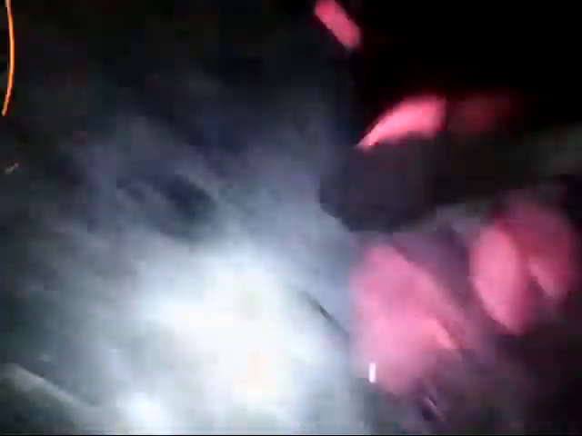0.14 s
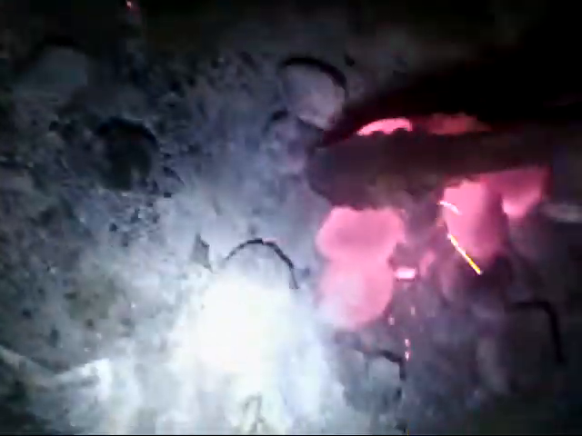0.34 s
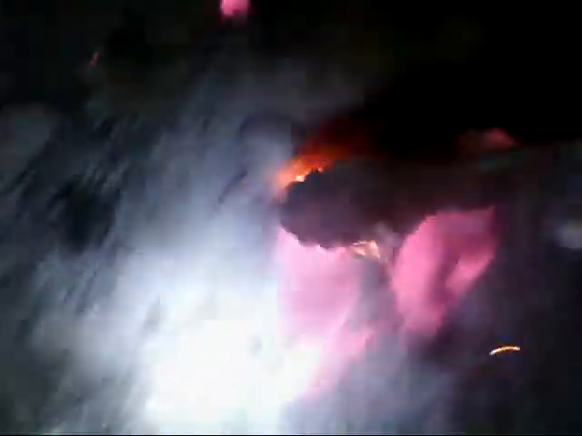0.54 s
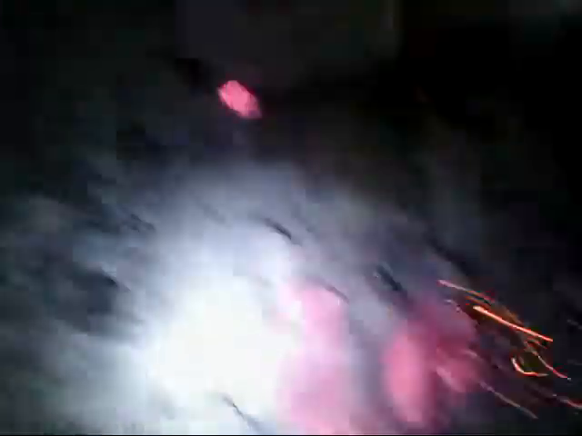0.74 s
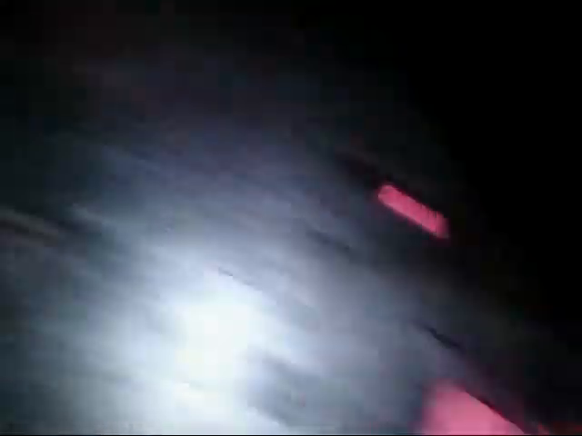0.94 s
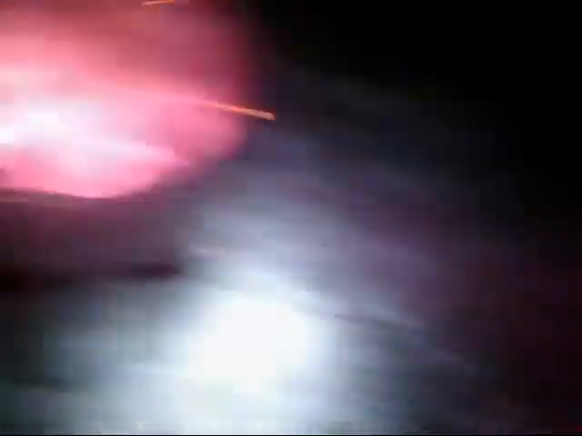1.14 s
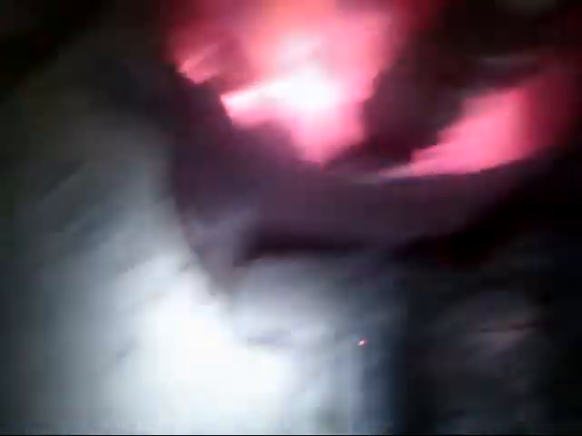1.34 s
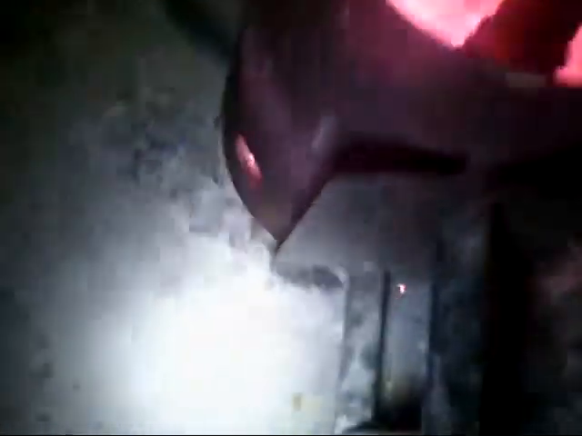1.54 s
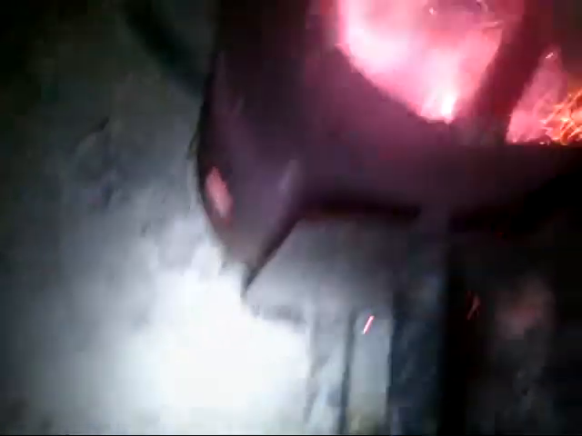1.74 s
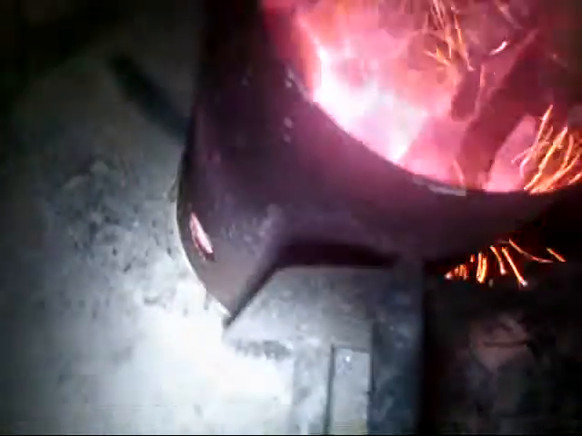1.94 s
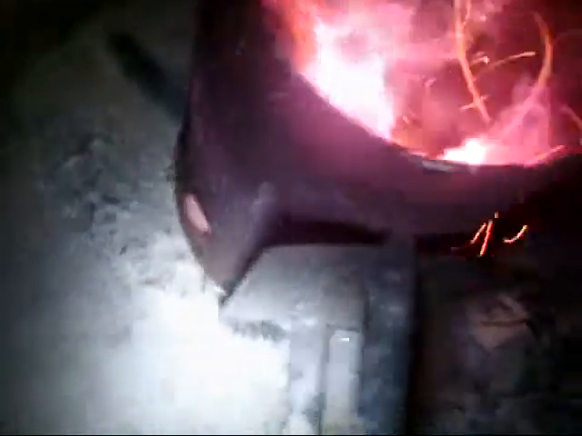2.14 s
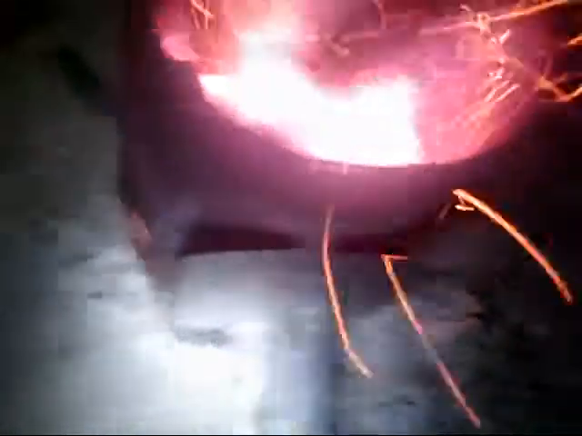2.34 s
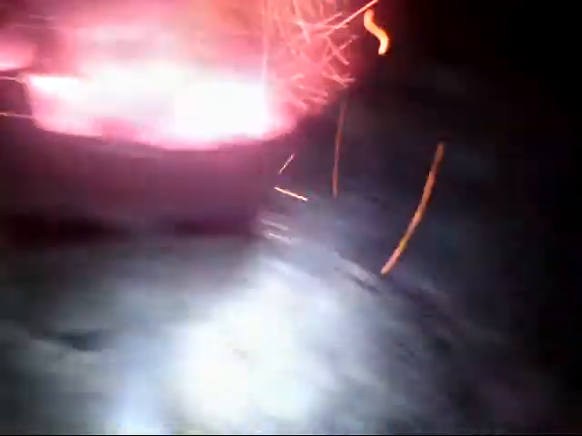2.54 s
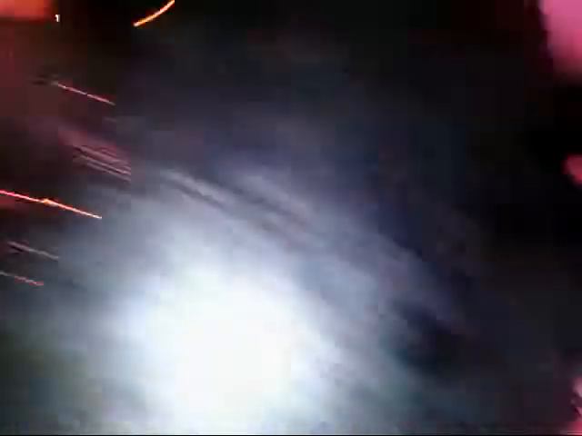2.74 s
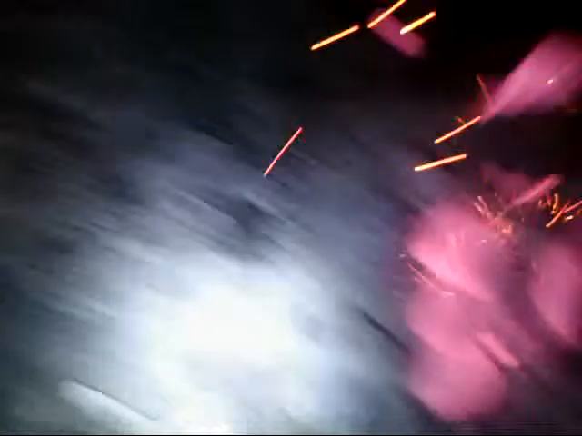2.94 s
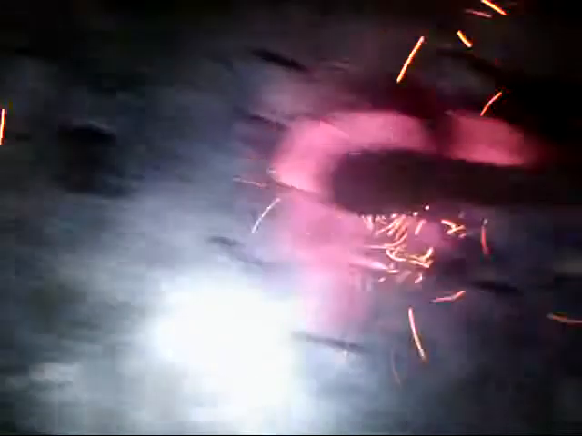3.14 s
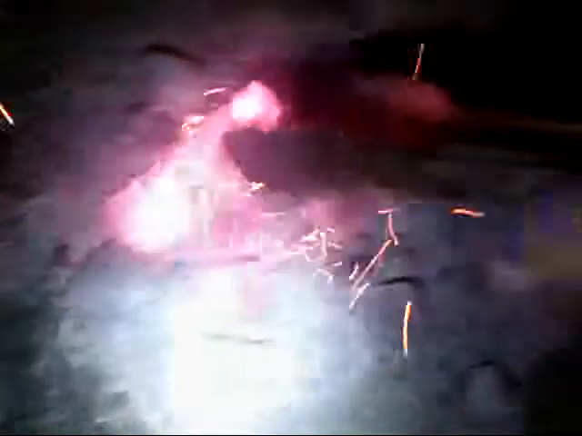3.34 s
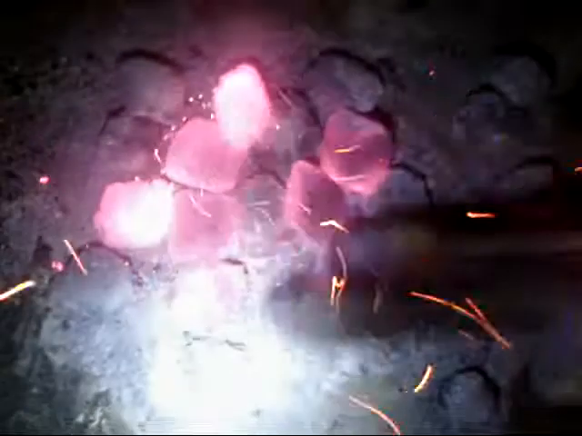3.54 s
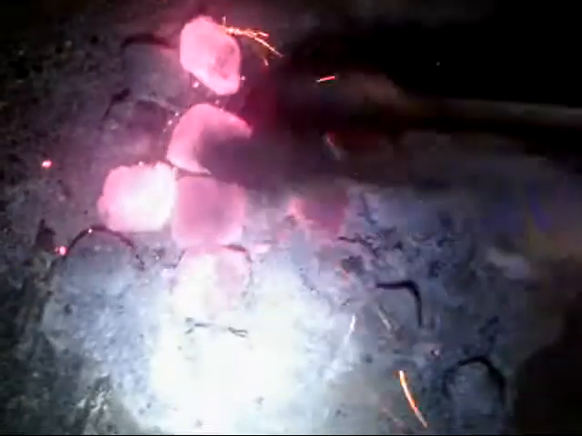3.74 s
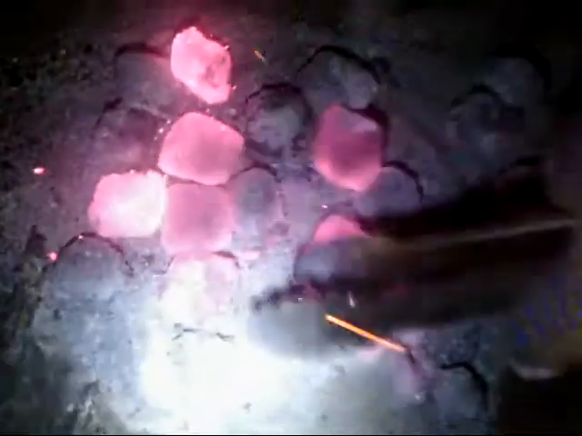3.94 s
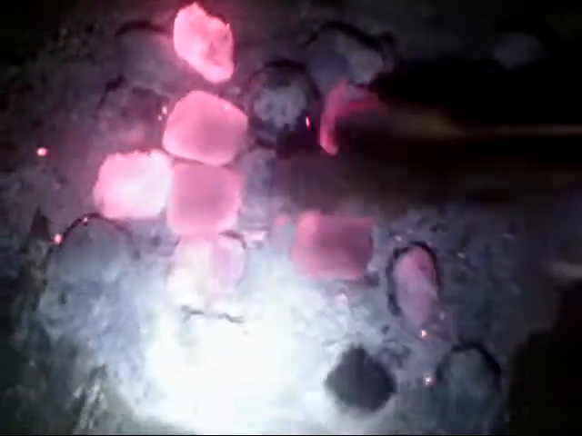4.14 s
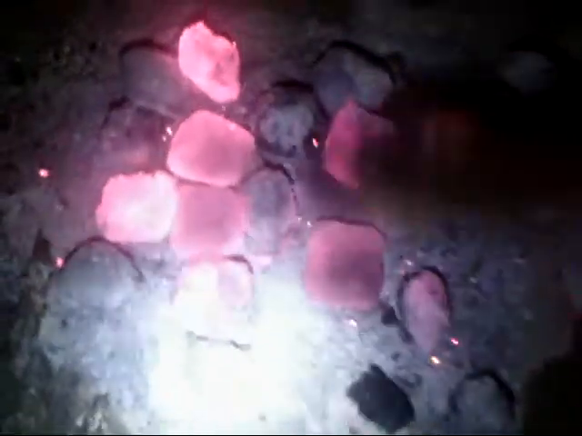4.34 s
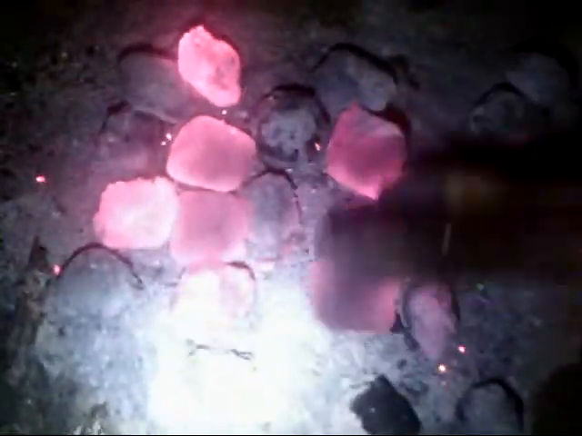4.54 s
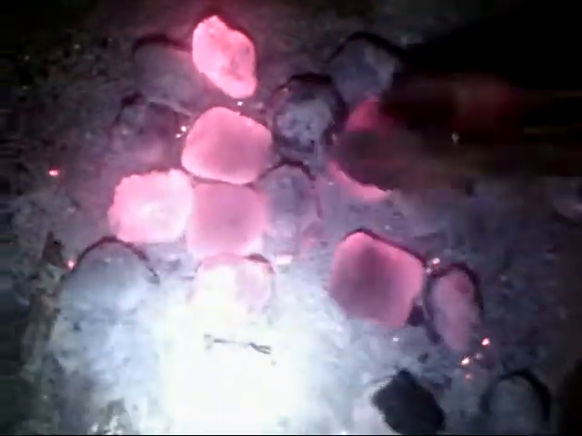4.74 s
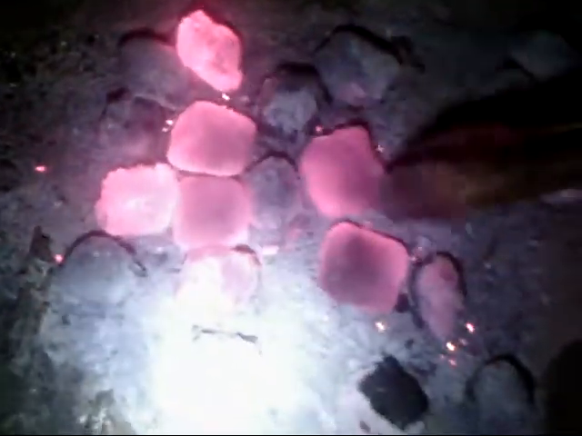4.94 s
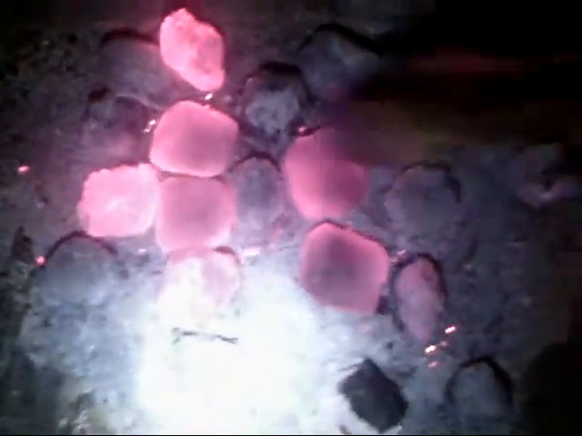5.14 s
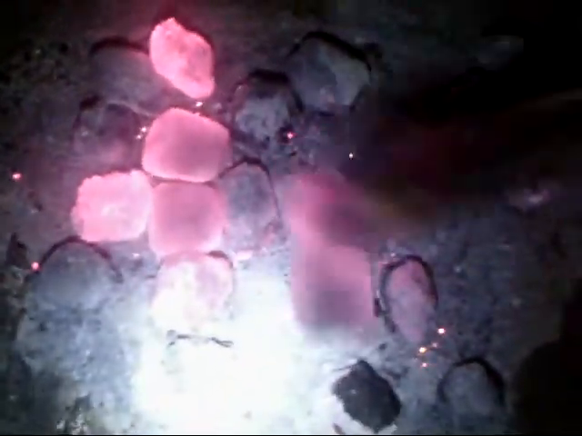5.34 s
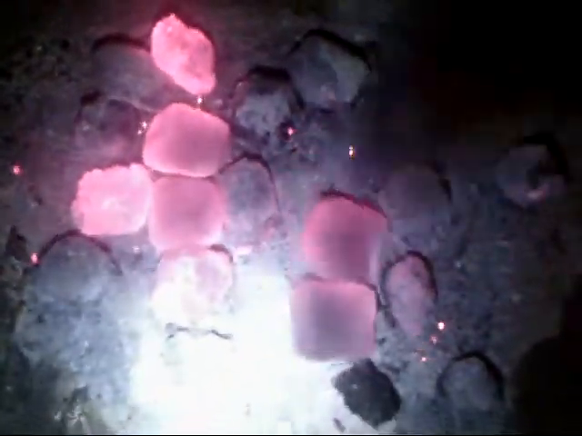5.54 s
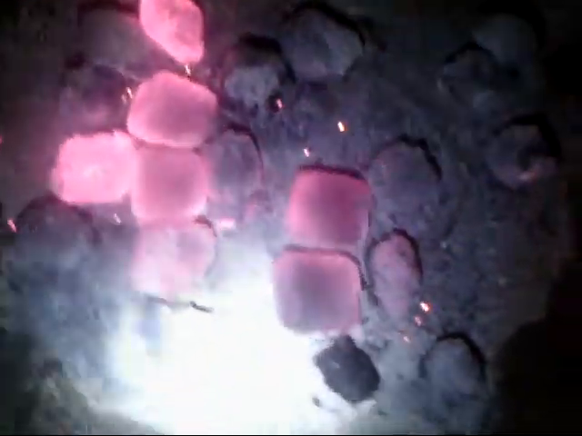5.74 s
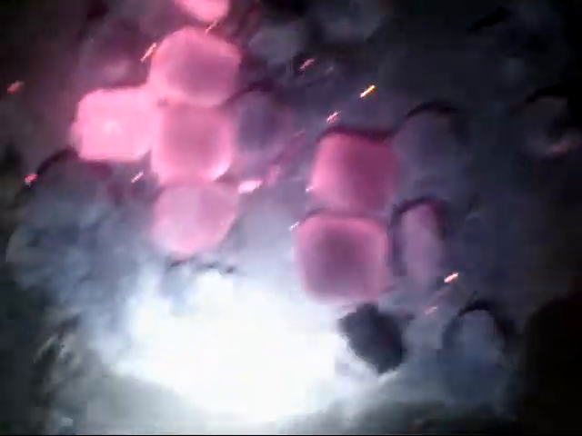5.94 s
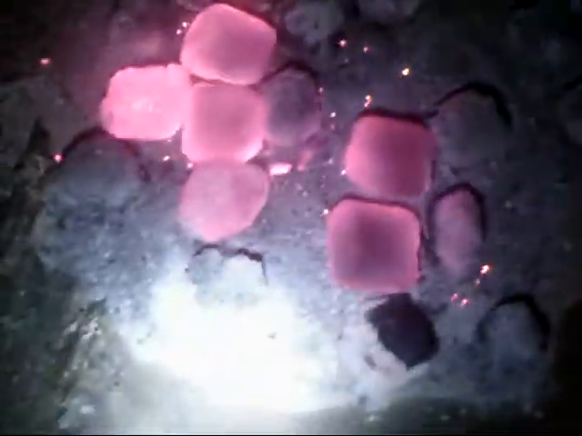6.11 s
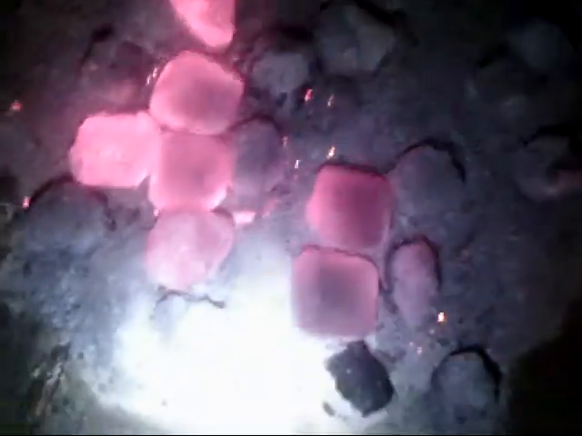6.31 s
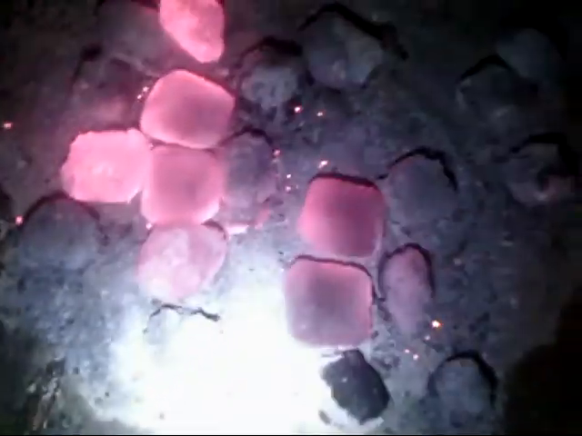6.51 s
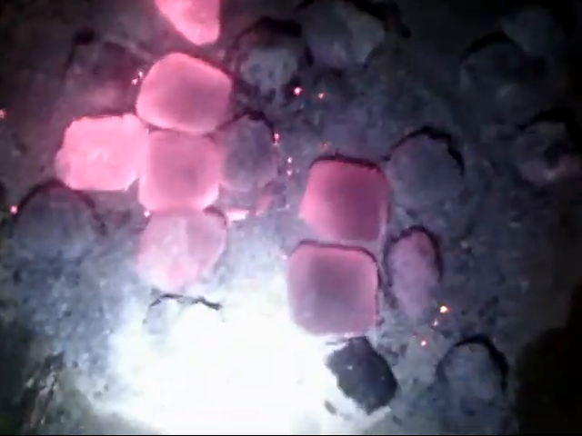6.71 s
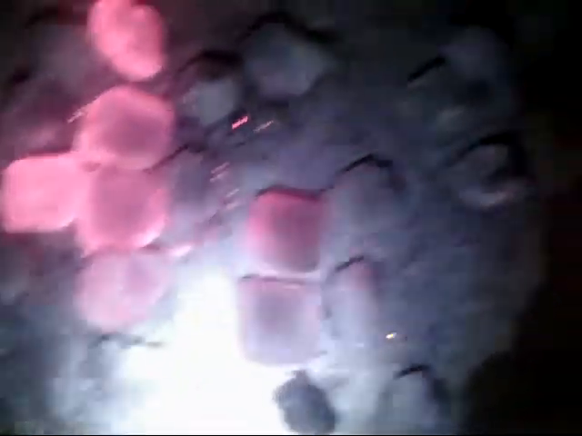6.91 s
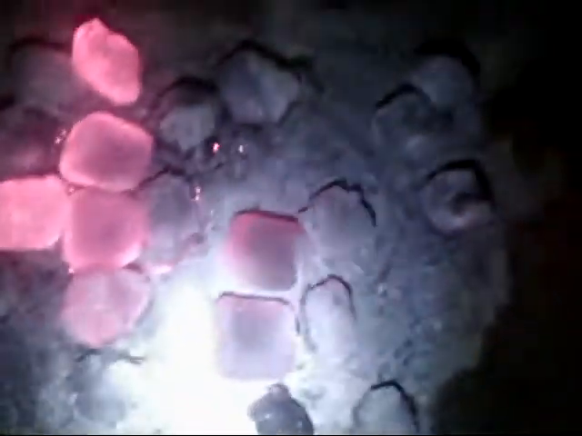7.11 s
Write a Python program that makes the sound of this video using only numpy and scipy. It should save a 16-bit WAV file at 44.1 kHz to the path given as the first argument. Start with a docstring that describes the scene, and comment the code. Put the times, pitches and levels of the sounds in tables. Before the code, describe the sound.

A low handling rumble opens close to the microphone over hiss, light wind and a thin fluttering whine. Tongs bump charcoal briquettes on an ashy iron lid in dull knocks, short scrapes and faint steel clinks. The loudest thud comes near three seconds, followed by a quick cluster and a sharp crack. Later touches are sparser, with a long quiet gap before a last pair of knocks.

```python
"""A low rumble as the camera is moved comes first, over air hiss, light wind and a fluttering whine.
Outdoors at night, tongs then set glowing charcoal briquettes on the ashy lid of a cast iron pot.
They knock dully, crumble and scrape; the tongs clink, and now and then a hot briquette cracks.
Bursts of force excite decaying modes of lid, charcoal and steel, and the yard adds a short scatter.
Shaped noise makes the rumble, wind and hiss; sine tones make the far hum and the camera's electronics."""
import sys
import numpy as np
from scipy import signal
from scipy.fft import rfft, irfft, next_fast_len
from scipy.io import wavfile

SR = 44100
rng = np.random.default_rng(int(sys.argv[2]) if len(sys.argv) > 2 else 0)


def put_to_file(sound):
    """Save the sound as 16-bit audio at rate SR, in the file named by the first command-line argument."""
    columns = np.atleast_2d(sound).T  # one column per channel
    safe = np.clip(columns, -1, 1)
    whole_steps = np.round(safe * 32767)
    wavfile.write(sys.argv[1], SR, whole_steps.astype(np.int16))


N = 320594
TIME = np.arange(N) / SR
AGE = TIME[:SR // 3]  # seconds since a contact

# Briquettes set down or bumped on the lid, levels of the first touch:
# start_s, knock_db, thud_db, crunch_db, knock_pitch_hz, thud_pitch_hz
KNOCK_EVENTS = [(0.528, -42, -37, -44, 630, 130), (0.649, -36.5, -31.5, -50, 610, 144),
                (1.487, -34.5, -39, -52, 570, 130), (1.589, -46, -44, -49, 1080, 163),
                (1.694, -32.5, -31.5, -61, 720, 290), (1.857, -42, -34.5, -65, 640, 139),
                (1.971, -49, -33.5, -53, 789, 190), (3.011, -23, -19, -44, 846, 122),
                (3.139, -48, -36.5, -55, 627, 129), (3.281, -47, -32.5, -47.5, 603, 124),
                (3.363, -32, -27, -55, 835, 140), (3.438, -48, -32.5, -57, 581, 195),
                (3.528, -46, -44, -49, 595, 269), (3.548, -46.5, -32, -46, 678, 167),
                (3.723, -63, -37, -60, 800, 140), (3.95, -38.5, -32.5, -40, 610, 127),
                (4.436, -37.5, -46, -53, 584, 163), (4.523, -40, -36, -43.5, 645, 142),
                (4.889, -39, -34, -47, 705, 126), (5.387, -48, -29, -50, 676, 127),
                (5.471, -42, -34, -42, 715, 129), (6.871, -36.5, -35, -40.5, 620, 288),
                (7.038, -48, -39, -52.5, 700, 140)]
# Briquettes pushed through ash: start_s, length_s, rub_db, crunch_db, thud_db, thud_pitch_hz
SCRAPE_EVENTS = [(0.519, 0.02, -45.5, -51, -42.5, 191), (1.485, 0.048, -47.5, -46, -46.5, 270),
                 (1.586, 0.037, -50, -49.5, -49, 250), (1.633, 0.022, -41, -45, -41, 270),
                 (1.686, 0.051, -39, -47, -38.5, 270), (1.773, 0.097, -46, -49.5, -42.5, 230),
                 (2.038, 0.065, -50, -47, -40, 192), (3.008, 0.031, -31, -46, -29, 206),
                 (3.182, 0.026, -48.5, -49.5, -38.5, 198), (3.94, 0.031, -40, -44.5, -41, 164),
                 (4.002, .055, -53, -55, -50.5, 151), (4.413, 0.019, -45.5, -56, -35, 148),
                 (4.834, 0.051, -43, -54, -39, 130), (4.888, 0.043, -41.5, -46.5, -37.5, 127),
                 (5.38, 0.073, -42, -46.5, -36.5, 120), (5.45, 0.035, -38, -49, -35.5, 131),
                 (6.027, 0.12, -53.5, -53.5, -49.5, 161), (6.876, 0.026, -39.5, -42.5, -34.5, 283)]
# Tongs meeting charcoal: start_s, level_db, pitch_hz
CLINK_EVENTS = [(0.501, -48, 1590), (0.538, -49, 2450), (1.489, -43, 1500), (1.722, -42, 2000),
                (3.02, -46, 2470), (3.973, -43, 2500), (4.888, -43, 2400), (5.412, -44, 2480),
                (5.444, -49, 3970), (5.475, -41, 2220), (6.058, -49, 3300), (6.110, -47, 1620),
                (6.138, -45.5, 3600), (6.872, -40, 2560), (6.895, -52, 1900)]
# Hot charcoal cracking: start_s, level_db, low_edge_hz, high_edge_hz
CRACK_EVENTS = [(2.08, -33, 594, 7700), (2.648, -43.5, 1480, 3830), (3.011, -45, 3030, 15500),
                (3.037, -51, 3000, 15000), (3.316, -47, 1200, 15000), (3.606, -31.5, 490, 15000),
                (6.175, -51, 1300, 13000)]

# Resonances, relative levels: pitch_hz, width_hz, level_db
# Briquette on iron, damped by ash
KNOCK_MODES = [(382, 22, -18), (547, 37, 1), (597, 72, 9), (703, 83, 7), (745, 29, 0), (924, 67, 3),
               (1132, 68, -6), (1240, 27, -27)]
# The loaded lid's low thud
LID_MODES = [(118, 41, 6.5), (200.4, 32, 0.5), (266, 270, -10)]
# Brittle charcoal against tongs and iron
CRUNCH_MODES = [(1340, 590, 11), (1980, 370, 2.5), (2400, 78, 12), (3250, 710, -44), (4100, 260, -1.5),
                (6000, 700, -13), (8270, 360, 2.5), (13500, 700, -1)]
# The steel tongs, damped by the hand
TONGS_MODES = [(1540, 160, 4), (2200, 76, -4.5), (2486, 48, 7.5), (4230, 120, 1.5), (5060, 170, -7),
               (8600, 310, -3)]
# A briquette cracking
CRACK_MODES = [(650, 280, 15.5), (1320, 310, -14), (1700, 290, 1), (2430, 210, 5), (3970, 320, -1.5),
               (5370, 150, -11), (6850, 130, 4), (8100, 1100, 2), (10900, 700, -41), (12100, 530, -13),
               (13600, 1100, -19)]

# Wind on the microphone, relative spectrum: pitch_hz, density_db_per_hz
WIND_SPECTRUM = [(4, 0), (10, 4.5), (18, -9.5), (33, -7), (50, -12), (68, -13), (98, -15.5), (150, -37.5),
                 (200, -59), (400, -75)]
# Low rumbles as the camera is moved, over the breeze: middle_s, half_length_s, rise_db
HANDLING_RUMBLES = [(0.03, 0.1, 11.5), (1.09, 0.21, 8.5)]
# Night air and microphone hiss, relative spectrum: pitch_hz, density_db_per_hz
AIR_SPECTRUM = [(100, -5.5), (190, -4.5), (280, -7.5), (450, -12), (700, -11.5), (1170, -13), (1500, -16),
                (2200, -18), (2520, -18.5), (2900, -21.5), (7500, -25), (9600, -26), (10600, -31.5),
                (15800, -34)]
# Distant hum, levels before wavering: pitch_hz, level_db
HUM_TONES = [(133, -53.5), (167, -56), (533, -67.5), (1168, -67.5)]
# Steady thin tones of the camera's electronics: pitch_hz, level_db
CAMERA_TONES = [(4801, -81), (5600, -75.5), (7401, -78)]

TOUCH_DB = 1.5  # spread of mode strengths between contacts
BLOW_S = 0.01  # a blow's level is its energy spread over this time
# Two rocking touches follow each landing, with their own thud pitch
ROCK_S, ROCK_UNEVEN, ROCK_THUD_HZ = 0.018, 0.12, 221
KNOCK_LOSS_DB, THUD_LOSS_DB, CRUNCH_LOSS_DB = 21.5, 6.5, 5  # per touch
CRUMBLE_S = 0.068  # time for the giving grains to fall 60 dB
GRAB_S, SWELL_DB = 0.013, 2  # a push takes hold, then bears down harder
RUB_T60_S, CRUNCH_T60_S, THUD_T60_S = 0.14, 0.16, 0.21  # 60 dB release times
# Level before the handling rumbles, spread, rate
BREEZE_DB, BREEZE_SWAY_DB, BREEZE_SWAYS_PER_S = -37, 1.65, 4.3
AIR_DB = -49.5
WHINE_HZ, FLUTTER_HZ, WHINE_DB = 2579.6, 19.89, -58.5  # level while fully on
CUTOFF_HZ, OFFSET = 15900, -0.016  # offset in parts of full scale


def knocks():
    """Each briquette lands and rocks twice; every touch shakes the lid and crushes charcoal."""
    out = np.zeros(N)
    for s, knock_db, thud_db, crunch_db, knock_hz, thud_hz in KNOCK_EVENTS:
        for touch in range(3):
            at = s + touch * ROCK_S * (1 + ROCK_UNEVEN * rng.uniform(-1, 1))
            press = contact(CRUMBLE_S, crumble_db=-1.5)
            crush = contact(CRUMBLE_S, crumble_db=28)
            iron = knock(knock_hz, focus_db=51)
            lid = thud(ROCK_THUD_HZ if touch else thud_hz)
            add(out, at, blow(press, iron, knock_db - touch * KNOCK_LOSS_DB))
            add(out, at, blow(press, lid, thud_db - touch * THUD_LOSS_DB))
            add(out, at, blow(crush, crunch(), crunch_db - touch * CRUNCH_LOSS_DB))
    return out


def scrapes():
    """A sliding briquette catches and slips, exciting lid and charcoal with small fractures."""
    grip = from_db(2.96 * drift(130))
    slips = rms_one(grains(N, per_s=1200, spread_db=2.5) * grip)
    fractures = rms_one(grains(N, per_s=800, spread_db=-1.5) * grip)
    out = np.zeros(N)
    for s, length_s, rub_db, crunch_db, thud_db, thud_hz in SCRAPE_EVENTS:
        sounds = [(slips, knock(pitch_hz=704, focus_db=1.5), rub_db, RUB_T60_S),
                  (fractures, crunch(), crunch_db, CRUNCH_T60_S),
                  (slips, thud(thud_hz), thud_db, THUD_T60_S)]
        for force, body, db, release_t60 in sounds:
            from_start = np.roll(force, -round(s * SR))[:SR]
            stroke = from_start * push(length_s, release_t60)
            add(out, s, from_db(db) * signal.fftconvolve(stroke, body))
    return out


def clinks():
    """The steel tongs ring briefly where they meet a hard edge."""
    out = np.zeros(N)
    for s, db, pitch_hz in CLINK_EVENTS:
        modes = favour(TONGS_MODES, pitch_hz, focus_db=19)
        steel = within(ring(modes, detune=0.014), low_hz=1190, high_hz=11000)
        add(out, s, blow(contact(crumble_s=0.026, crumble_db=4.5), steel, db))
    return out


def cracks():
    """A hot briquette splits in a dense burst of fractures that falls 60 dB in 29 ms."""
    out = np.zeros(N)
    for s, db, low_hz, high_hz in CRACK_EVENTS:
        shard = within(ring(CRACK_MODES, detune=0.0085), low_hz, high_hz)
        add(out, s, blow(contact(crumble_s=0.029, crumble_db=29), shard, db))
    return out


def knock(pitch_hz, focus_db):
    """The dull note of charcoal on iron."""
    modes = favour(KNOCK_MODES, pitch_hz, focus_db)
    return within(ring(modes, detune=0.045), low_hz=396, high_hz=1234)


def thud(pitch_hz):
    """The lid gives under the weight."""
    modes = favour(LID_MODES, pitch_hz, focus_db=20)
    return within(ring(modes, detune=0.044), low_hz=78, high_hz=370)


def crunch():
    """The bright sound of a breaking grain."""
    return within(ring(CRUNCH_MODES, detune=0.012), low_hz=970, high_hz=13100)


def contact(crumble_s, crumble_db):
    """One push, then grains giving way ever more weakly."""
    fading = grains(len(AGE), per_s=3800, spread_db=-0.5) * from_db(-60 * AGE / crumble_s)
    force = from_db(crumble_db) * unit_energy(fading)
    force[0] += 1
    return unit_energy(force)


def grains(size, per_s, spread_db):
    """Tiny fractures of either sign at random moments, with sizes scattered in decibels."""
    chance, sign = rng.random((2, size))
    sizes = from_db(spread_db * np.minimum(rng.exponential(1, size), 4))
    return rms_one((chance < per_s / SR) * np.sign(sign - 0.5) * sizes)


def push(length_s, release_t60):
    """The pressure of one stroke: attack, swelling hold, release."""
    t = TIME[:SR]
    swell_db = SWELL_DB * (np.minimum(t / length_s, 1) - 0.5)
    release_db = -60 * np.maximum(t - length_s, 0) / release_t60
    return np.minimum(t / GRAB_S, 1) * from_db(swell_db + release_db)


def blow(force, body, db):
    """A body struck at a given level."""
    return from_db(db) * np.sqrt(BLOW_S * SR) * signal.fftconvolve(force, body)


def favour(modes, pitch_hz, focus_db):
    """The point of contact favours one pitch; modes fade by focus_db per octave away from it."""
    return [(hz, width, db - focus_db * abs(np.log2(hz / pitch_hz))) for hz, width, db in modes]


def ring(modes, detune):
    """A body's answer to one click; each contact weights and shifts the modes a little."""
    out = 0
    for hz, width, db in modes:
        strength, shift = rng.standard_normal(2)
        swing = np.cos(2 * np.pi * hz * (1 + detune * shift) * AGE)
        decay = np.exp(-np.pi * width * AGE)
        out = out + from_db(db + TOUCH_DB * strength) * width * swing * decay
    return unit_energy(out)


def within(x, low_hz, high_hz):
    """Keep the range that a body radiates."""
    band = signal.butter(3, [low_hz, high_hz], "band", fs=SR, output="sos")
    return unit_energy(signal.sosfilt(band, x))


def yard(x, tail_db, tail_t60, tail_hz):
    """A short scatter from the ground and things around, with weakened treble."""
    scatter = rng.standard_normal(len(AGE)) * from_db(-60 * AGE / tail_t60)
    scatter = scatter * (1 - np.exp(-AGE / 0.003))  # soft onset
    late = signal.fftconvolve(x, unit_energy(scatter))[:N]
    return x + from_db(tail_db) * (lowpass(late, tail_hz) + from_db(-5.5) * late)


def wind_and_handling():
    """A light, restless breeze on the microphone; the same low noise rises as the camera is moved."""
    rumble_db = sum(db * np.exp(-((TIME - s) / half_s) ** 2) for s, half_s, db in HANDLING_RUMBLES)
    sway_db = BREEZE_SWAY_DB * drift(BREEZE_SWAYS_PER_S)
    return from_db(BREEZE_DB + sway_db + rumble_db) * noise(WIND_SPECTRUM)


def air():
    """Even hiss of night air and microphone: steady shaped noise."""
    return from_db(AIR_DB) * noise(AIR_SPECTRUM)


def far_hum():
    """Distant sine tones that waver in level and phase."""
    out = np.zeros(N)
    for hz, db in HUM_TONES:
        level = from_db(db + 1.75 * drift(14))
        out += level * np.sin(2 * np.pi * hz * TIME + 1.48 * drift(11))
    return np.sqrt(2) * out


def electronics():
    """The camera's thin steady tones, and a whine that fades on and off at the flutter rate."""
    on = np.clip(1.5 - 2.5 * np.cos(2 * np.pi * FLUTTER_HZ * TIME + 0.2), 0, 1)
    whine = from_db(WHINE_DB) * on * np.sin(2 * np.pi * WHINE_HZ * TIME)
    steady = sum(from_db(db) * np.sin(2 * np.pi * hz * TIME) for hz, db in CAMERA_TONES)
    return np.sqrt(2) * (whine + steady)


def noise(spectrum):
    """Random noise of a given colour, unit power."""
    hz, db = np.transpose(spectrum)
    size = next_fast_len(N)
    bins_hz = np.maximum(np.arange(size // 2 + 1) * SR / size, 1)
    colour = from_db(np.interp(np.log(bins_hz), np.log(hz), db))
    white = rfft(rng.standard_normal(size))
    return rms_one(irfft(white * colour, size)[:N])


def drift(rate):
    """Random wander about zero: straight lines between normal draws, rate of them per second."""
    knots = rng.standard_normal(2048)
    return np.interp(TIME * rate, np.arange(len(knots)), knots)


def lowpass(x, hz):
    """A gentle causal treble cut."""
    return signal.sosfilt(signal.butter(2, hz, fs=SR, output="sos"), x)


def from_db(db):
    """Decibels to gain."""
    return 10 ** (np.asarray(db) / 20)


def rms_one(x):
    """Scale to unit power."""
    return x / np.sqrt(np.mean(x ** 2) + 1e-20)


def unit_energy(x):
    """Scale a response to unit energy."""
    return x / np.sqrt(np.sum(x ** 2) + 1e-20)


def add(track, s, sound):
    """Mix a sound into a track at a time."""
    start = round(s * SR)
    track[start:start + len(sound)] += sound[:N - start]


def scene():
    """Charcoal and tongs in the yard, over wind, camera handling, air, far hum and electronics."""
    contacts = knocks() + scrapes() + clinks() + cracks()
    coals = yard(contacts, tail_db=-7, tail_t60=0.14, tail_hz=2900)
    return (coals + wind_and_handling() + air() + far_hum() + electronics())[None]


def record(dry):
    """The converter cuts the top steeply and sits a little off zero."""
    top_cut = signal.ellip(10, 0.2, 80, CUTOFF_HZ, fs=SR, output="sos")
    return signal.sosfilt(top_cut, dry) + OFFSET


dry = scene()
out = record(dry)
put_to_file(out)
```